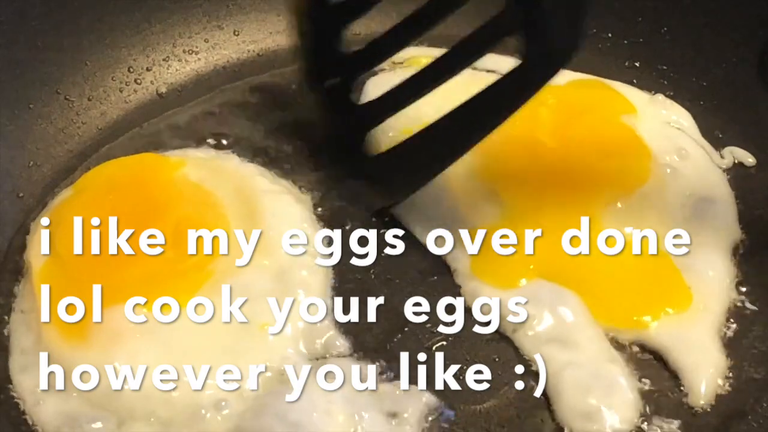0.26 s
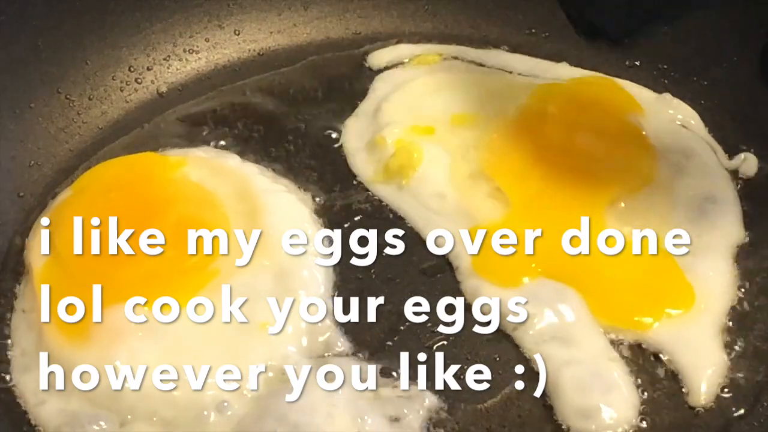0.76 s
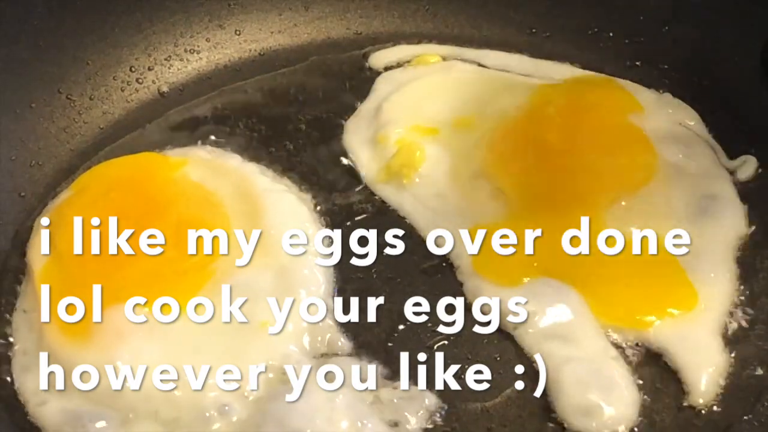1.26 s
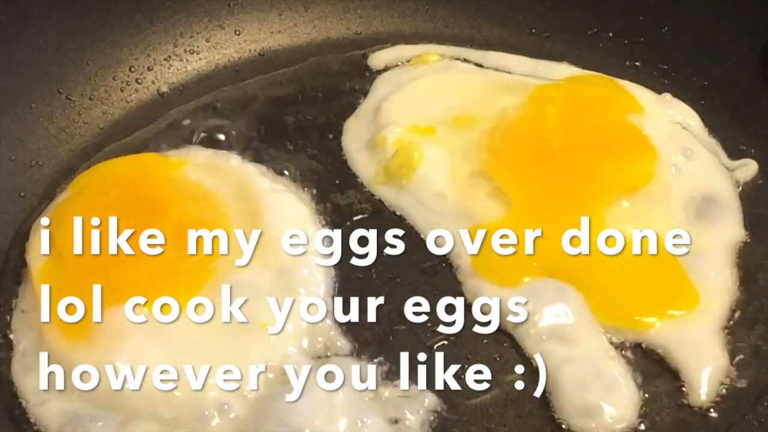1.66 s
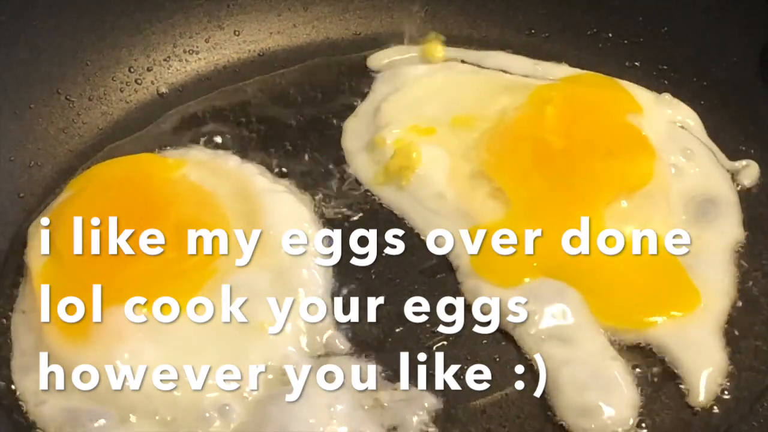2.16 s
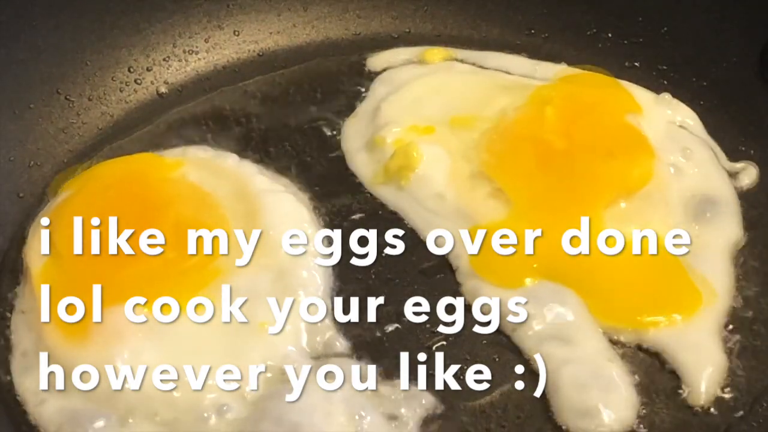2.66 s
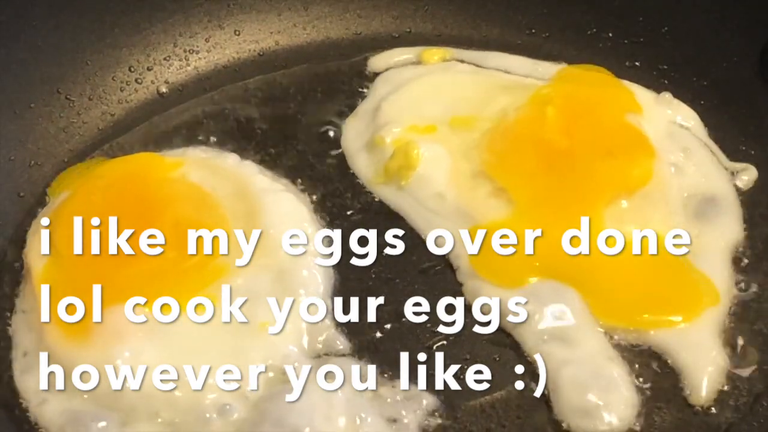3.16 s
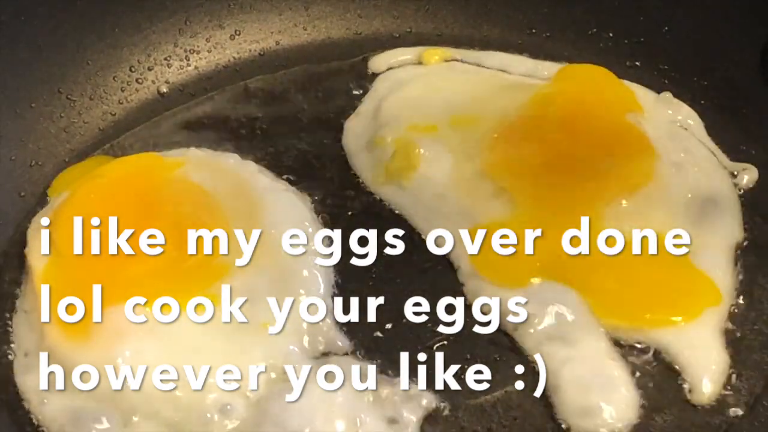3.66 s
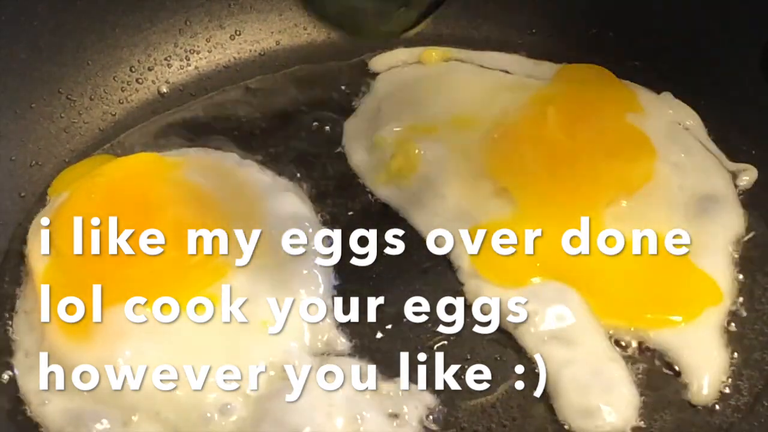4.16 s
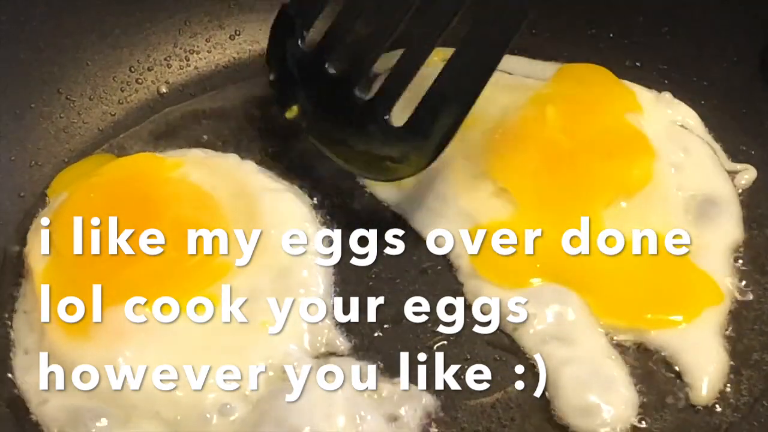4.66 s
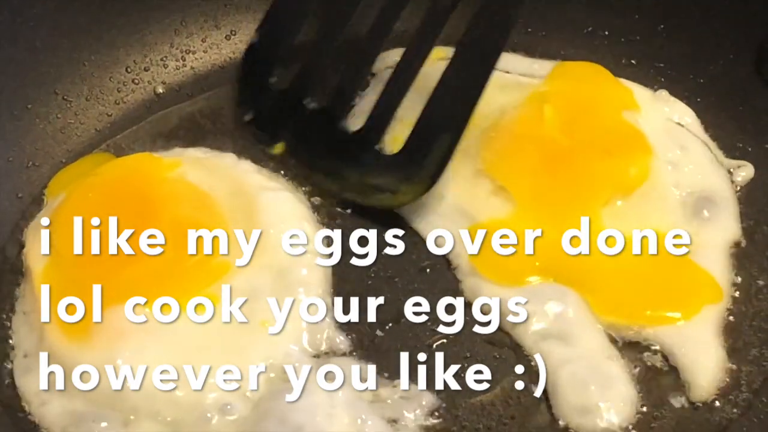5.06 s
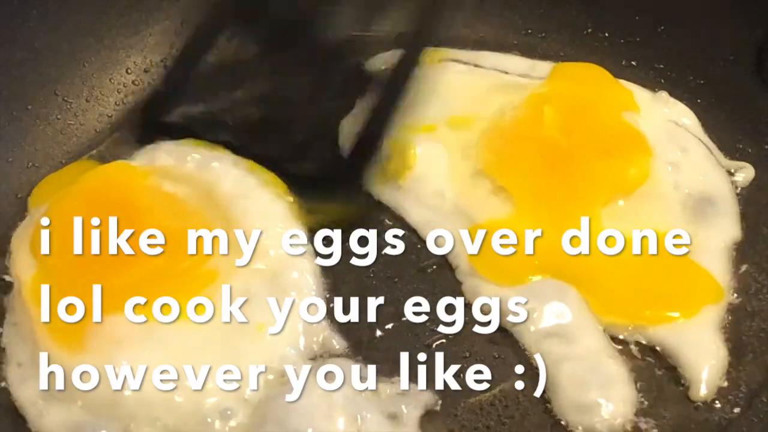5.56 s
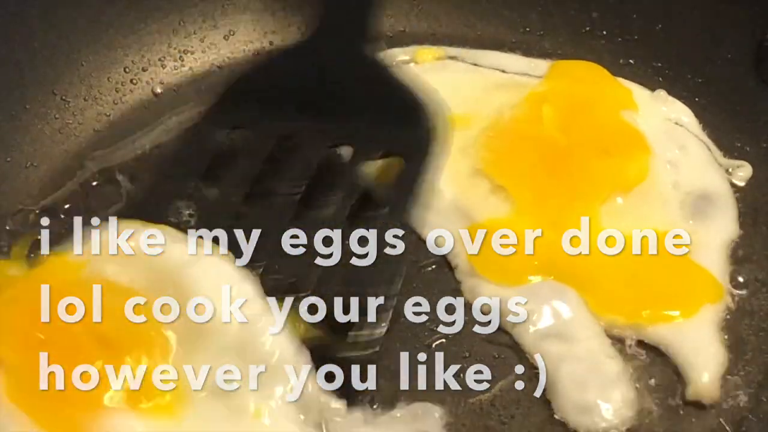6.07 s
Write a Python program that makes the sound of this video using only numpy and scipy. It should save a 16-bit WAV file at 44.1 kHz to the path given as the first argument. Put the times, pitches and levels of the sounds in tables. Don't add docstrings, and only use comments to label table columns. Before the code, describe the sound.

Eggs fry in oil close to a small microphone in a hard, lightly reverberant kitchen. A quiet fine sizzle is constant, with a barely audible low fridge hum beneath. Small pops and spits scatter from the start, with a faint spatula tap near 0.27 s and a bright, crisp burst at 0.74. Sparse ticks follow; a hollow pop at 2.0 leads to a lower sputter at 2.2 with a tiny rising hiss. The sound dips softly around 2.9. Pops resume, with a snap and weaker burst at 3.4 and a cluster at 3.8-3.9. A very sharp crack hits at 4.87. Plastic bumps on the pan begin at 5.3, and a long, loud sputter breaks out at 5.41. A faint scrape and low groan come at 5.6-5.9, with another softer slide. The sizzle swells toward 6.0, then a hard crack and spitting burst at 6.1 and a final pop at 6.25.

```python
import sys
import numpy as np
from scipy import signal
from scipy.fft import rfft, irfft, next_fast_len
from scipy.io import wavfile
from scipy.ndimage import uniform_filter1d, minimum_filter1d

SR = 44100
rng = np.random.default_rng(int(sys.argv[2]) if len(sys.argv) > 2 else 0)


def invert_db(level):
    return 10 ** (np.asarray(level, dtype=float) / 20)


def dump_mix(stems):
    frames = np.atleast_2d(stems).T
    limited = np.clip(frames, -1, 1)
    pcm = np.round(limited * 32767).astype(np.int16)
    wavfile.write(sys.argv[1], SR, pcm)


N = 278690

# t/s, level/dB
FRYING = [(0, 0), (.5, 0), (1.5, 0), (2.1, -0.4), (2.55, 1.1), (3.3, -0.5), (4.1, .5), (5.1, -1.3),
          (5.62, 0.7), (5.74, 1.5), (5.84, 2.5), (6, 5), (6.32, 2.5)]
# f/Hz, density/dB
BODY_SPECTRUM = [(240, -31), (400, 2), (754, -8.5), (838, 3.5), (922, -3.5), (1390, -0.5), (1510, -4.5),
                 (2240, -1), (4000, -5.5), (5000, -5.5), (6500, -42), (11000, -120)]
TOP_SPECTRUM = [(2060, -8), (3500, -35), (5510, 1.5), (6210, -3.5), (9360, 2), (11900, 0), (14700, 1.5),
                (15800, -1)]
BODY_DB, TOP_DB, TOP_GROWS = -58.5, -56, 0.88

# f/Hz, density/dB
RUMBLE_SPECTRUM = [(28, -45), (42, -27), (72, -5.5), (86, -12.5), (140, -2), (194, -4.5), (253, -10.5),
                   (294, -6.5), (333, -8), (419, -19.5), (700, -15.5), (910, -38), (1540, -120)]
HUM_HZ, HUM_DB, RUMBLE_DB = 59.5, -61.5, -60.5

FADE_S, FADE_HALF_S, RUMBLE_DIPS = 2.92, 0.44, 1.4

# t/s, vent/ms, f/Hz, level/dB
POPS = [(.0647, 6.9, 2410, -42.5), (.152, 6.7, 1210, -50.5), (.2655, 4, 1380, -43),
        (.3468, 3.8, 1900, -46.5), (.6474, 7.2, 1340, -44.5), (1.0225, 3.1, 3020, -45),
        (1.5988, 6.3, 1450, -44.5), (1.6321, 5.2, 4010, -51.5), (1.809, 8, 1920, -41),
        (1.8624, 6.9, 2400, -49), (1.895, 2.5, 1090, -42.5), (2.0022, .76, 1600, -35),
        (2.2183, .9, 1860, -32.5), (2.5918, 2.1, 2130, -46), (3.097, 2.5, 990, -48),
        (3.3874, 0.99, 1680, -33.5), (3.4064, 4.3, 2120, -49), (3.7374, 2.7, 1610, -47.5),
        (3.8324, 2.7, 1570, -36.5), (3.9129, 3.8, 1960, -36), (3.9797, 3.2, 1780, -48),
        (4.2728, 2.4, 1320, -50.5), (4.5046, 3, 1910, -43), (4.8073, 4, 2520, -53.5),
        (4.8669, 0.6, 2370, -36.5), (5.3032, 10, 1890, -37.5), (5.6946, 4.6, 1160, -49.5),
        (5.727, 10, 1000, -49.5), (6.0226, 12.6, 2700, -37), (6.2484, 1.3, 1920, -29)]
# t/s, vent/ms, f/Hz, level/dB
PLOPS = [(.5706, 1.5, 3700, -45), (.6294, 2.6, 990, -40.5), (.6402, 2.2, 3220, -42),
         (.7308, 2.4, 3720, -33.5), (1.1336, 3, 3070, -46), (1.1956, 2.5, 2810, -49), (1.315, 5, 1180, -52),
         (1.6578, 1.5, 4620, -40.5), (2.014, 2.4, 2720, -51), (2.329, 3.1, 1700, -44.5),
         (2.3535, 3.4, 2280, -43), (2.3739, 1.2, 2300, -38), (2.486, 1.5, 2350, -49),
         (2.4997, 1.8, 1940, -48), (3.0069, 6.9, 1250, -52), (3.5597, 2.7, 720, -48.5),
         (3.639, 1.6, 1830, -46), (3.7715, 1.7, 2960, -44), (3.789, 5.8, 3730, -48),
         (3.8751, 1.2, 1080, -48), (3.9686, 1.8, 1710, -46), (4.358, 4.3, 3700, -49.5),
         (4.537, 2.2, 2560, -44), (4.6099, 4.1, 2500, -35.5), (4.8539, 1.3, 1860, -47.5),
         (5.312, 4.1, 1260, -35.5), (5.326, 9, 1250, -53), (5.5937, 4.8, 1740, -45.5),
         (5.7057, 1.2, 1340, -52), (5.9169, 5.4, 2730, -40.5), (.139, 1.2, 5540, -43),
         (.5692, 1.4, 5450, -44), (.6245, 3, 5570, -49), (.9912, 1.7, 5540, -49), (1.56, 3, 3300, -51),
         (1.6328, 2.5, 4500, -45), (1.8068, 2.5, 4800, -43), (2.0244, 2, 6650, -46),
         (2.2105, 1.8, 2900, -53), (2.2158, 1.5, 1800, -45), (4.802, 1.5, 4000, -58), (5.512, 7, 5500, -39),
         (5.9125, 3, 5440, -47), (5.9125, 3, 2400, -46), (5.991, 3, 5030, -48), (6.096, 1.4, 2400, -44),
         (6.251, 9, 2600, -45)]
# t/s, peak/dB, f/Hz
BLIPS = [(0.217, -42.5, 2560), (0.238, -42, 2230), (0.379, -39.5, 2190), (0.43, -39, 2210),
         (0.489, -45, 3080), (0.844, -44, 2930), (0.859, -45, 1250), (0.994, -43, 1430), (1.554, -45, 1030),
         (1.719, -41, 1050), (2.841, -41, 1390), (2.877, -45.5, 872), (3.336, -42, 2090), (4.224, -48, 842),
         (4.308, -43, 2060), (4.469, -44, 1920), (5.029, -43, 2770), (5.127, -45, 1430), (5.229, -43, 2690),
         (5.539, -38, 2700), (5.759, -43, 2740), (5.991, -38, 2900), (6.289, -36.5, 2550)]
# opening t/s, f/Hz, width over pitch
POCKETS = [
    (.74, 3000, 0.51),
    (2.22, 2090, 0.49),
    (3.43, 1920, 0.88),
    (5.41, 2750, 0.5),
    (6.1, 2450, 0.85),
]
# t/s, vent/ms, cavity level/dB, jet level/dB, fineness (0 drops - 2 mist)
VENTS = [(0.7416, 3.5, -33.5, -24, 1.5), (.7445, 3.5, -32, -29, 1.5), (0.7483, 4.3, -31, -27.5, .5),
         (0.7538, 4.2, -34.5, -28, 1.2), (2.2212, 3.2, -31.5, -33, 0.2), (2.2255, 3.4, -32, -32, 0),
         (2.2288, 2.8, -29.5, -25, 1.3), (2.232, 1.4, -31, -26, .9), (2.2345, 2.3, -41, -33.5, 0.5),
         (2.2492, 0.9, -46, -37, 1.5), (3.434, 4, -45, -42.5, .5), (3.439, 3.1, -42.5, -35, .65),
         (3.4445, 3.4, -43, -44, 1.05), (3.452, 6.1, -41, -40.5, .5), (3.4817, 4.9, -40.5, -40, 1),
         (5.4172, 2, -33, -26, .7), (5.4187, 3.5, -23.5, -18.5, 0.94), (5.4241, 4.8, -31.5, -21, 1),
         (5.4294, 4.5, -34, -24, 0.9), (5.435, 6, -40, -31, 1), (5.442, 4.6, -32, -30.5, -0.2),
         (5.4475, 5, -31.5, -27, -0.5), (5.454, 7.9, -46, -40, 1), (5.4642, 4, -44, -43, 2.3),
         (5.4708, 5.5, -41, -40, -1), (5.4803, 21, -67, -47, 1), (5.5032, 7.4, -38.5, -35.5, -0.5),
         (5.508, 7.6, -47, -38.5, 0.2), (6.1031, 2.3, -26, -17.5, 1), (6.106, 5.5, -30.5, -27.5, 0.8),
         (6.1146, 6.3, -34, -35, 1.5), (6.123, 11.6, -36.5, -40, 0.5), (6.14, 4, -42, -50, .9),
         (6.1507, 6, -41, -36.5, 1)]
# f/Hz, width/Hz, level/dB
PAN_MODES = [(865, 27, 30), (1340, 40, -25.5), (1700, 180, 17), (2800, 50, -15)]
POP_WIDTH, PLOP_WIDTH, BLIP_WIDTH = 0.7, 0.28, 0.49
BLIP_MS, BLIP_CREST_DB = 3.2, 9.5

# t/s, vent/ms, level/dB, fineness (0 drops - 2 mist)
SPITS = [(0.0654, 3.8, -58, -4), (.139, 1.8, -46.5, 0.8), (.623, 8.4, -49.5, -1.5), (.6394, 1.4, -44, 3),
         (.7177, 1.3, -45, -0.1), (0.9766, 1.2, -45.5, -5), (1.1343, 1.6, -47, 2.4),
         (1.5973, 3.6, -50, 0.3), (1.6314, 3.6, -53, 1.1), (1.8128, 2.2, -45.5, 0.5), (2.253, 10.4, -51, 5),
         (3.405, 1.4, -43, -0.5), (3.458, 7, -45, .9), (3.6387, 1.8, -48, 0.7), (3.791, 5, -46, -1.5),
         (3.944, 2.1, -49, -0.5), (4.4038, 1.46, -43, -3), (5.3385, 5, -49.5, -3), (5.458, 3.8, -43, 5),
         (5.5948, 1.5, -42, 3), (5.6719, 0.91, -43.5, 0.5), (5.701, 1.6, -45, -0.2),
         (5.8563, 1.7, -41.5, 1.5), (5.937, 3.2, -41, 0.6), (5.941, 5.8, -49, .6), (5.9656, 0.79, -46, -.1),
         (6.022, 3, -40, 1), (6.026, 3.5, -33.5, 0.9), (6.031, 10.3, -38, 0.9), (6.1667, 7.4, -45, -0.3),
         (6.248, 1.4, -45, 0.5)]
# t/s, level/dB, fineness (0 drops - 2 mist)
TICKS = [(0.2388, -47, 3), (.3128, -42.5, 1.3), (0.57, -43, 0), (.647, -43.5, 0.4), (0.739, -33, 2),
         (0.992, -42, -2), (1.0226, -45, 2.4), (1.1551, -41.5, 1.4), (1.6584, -49, 5), (1.7686, -46, 1.2),
         (1.8086, -52, 1), (1.8956, -42.5, 0), (2.0252, -41.5, 0.5), (2.4146, -41.5, 6), (2.4996, -41, 1.3),
         (3.3869, -35.5, -2), (3.4079, -46, 0), (3.4293, -41, 0.4), (3.6523, -48, 1.5), (3.832, -40.5, 1),
         (3.834, -35.5, 0), (3.8372, -41, 5), (3.9129, -33.5, 0.1), (3.916, -37, 5), (3.939, -48, 0.5),
         (4.5047, -38, 5), (4.8078, -43, 1), (4.8668, -31, 1.4), (5.6, -50, 1), (5.8379, -40, 1.8),
         (1.8625, -50, .7), (2.5441, -45, 1), (2.8816, -50, 2.5), (3.7366, -48, 0.8), (3.979, -48, .3),
          (4.3192, -45.5, 0.3), (4.4306, -51, .7), (4.5099, -47, 2.2), (5.383, -50, 0.7),
          (2.109, -50.5, 1.3), (5.9, -48, 0), (5.921, -46, 1), (5.933, -46, .5), (5.996, -45, 0.5),
          (6.008, -47, .8), (6.014, -47, 1.2)]
# f/Hz, width/Hz, level/dB
SPIT_MODES = [(4440, 1930, 7), (7100, 2700, 6)]
SPRAY_MODES = [(9050, 3630, -0.24), (10900, 4240, -2.5)]
MIST_MODES = [(12130, 6800, 0), (15900, 1100, 0)]
TICK_MS = 0.81
SINGLE_LOSS_DB, POCKET_LOSS_DB = 7, 8

# t/s, peak/dB
SNAPS = [(.2652, -33), (.4915, -32), (0.7394, -20), (1.0228, -36), (2.2497, -27), (3.4402, -22),
         (3.7372, -36), (3.7642, -37), (3.7718, -33), (3.8322, -28), (3.9124, -24), (3.9505, -37),
         (3.9688, -36), (4.8076, -24), (4.8669, -9.5), (4.8671, -12), (4.8704, -30), (4.8723, -25),
         (5.3095, -33), (5.5418, -35), (5.5952, -31), (5.9657, -28), (6.1036, -14), (6.1043, -10),
         (6.2484, -27), (6.2893, -32)]
# f/Hz, width/Hz, level/dB
CRACK_MODES = [(2500, 2500, -10), (10600, 7200, 1.5)]
SNAP_WET_DB = -9

# f/Hz, t60/s
KITCHEN_T60 = [(300, 0.98), (2000, 0.41), (8000, 0.32), (15000, 0.16)]

# t/s, peak/dB, f/Hz, t60/s
BUMPS = [(.266, -51.5, 792, 0.44), (0.266, -38, 1433, 0.054), (.268, -43, 706, 0.056),
         (.292, -48, 760, .07), (.308, -53, 1410, 0.088), (1.899, -54.5, 818, 0.26),
         (4.135, -52, 65.4, 0.22), (5.302, -46, 1247, 0.28), (5.303, -37, 1560, 0.12),
         (5.422, -34.5, 852, 0.13), (5.426, -44.5, 151, 0.26), (5.433, -39, 306, 0.083),
         (5.519, -44.5, 410, 0.074), (5.529, -46.5, 135, 0.53), (5.782, -38, 137, 0.21),
         (5.84, -44, 147.4, 0.28), (6.103, -31.5, 780, 0.02)]

# t/s, length/s, start f/Hz, end f/Hz, level/dB
WHISTLES = [
    (2.2212, .0135, 5000, 11200, -27),
    (2.2186, .003, 3000, 10500, -38),
]
WHISTLE_WIDTH_HZ = 1700

# t/s, length/s, level/dB
SLIDES = [
    (5.658, 0.14, -51.5),
    (5.883, .12, -57),
]
# f/Hz, width/Hz, level/dB
SCRAPE_MODES = [(6400, 2400, 0), (1200, 900, -11)]
# f/Hz, width/Hz, level/dB
GROAN_MODES = [(277, 270, 0)]
GROAN_S, GROAN_LENGTH_S, GROAN_DB = 5.62, 0.31, -58

CEILING, KNEE = 0.55, 3
STEADY_HZ, TOP_HZ = 15950, 16900


def unit(x):
    return x / np.sqrt(np.mean(x ** 2) + 1e-20)


def held(x, ms):
    return x / np.sqrt(np.sum(x ** 2) / ((ms + 1.33) * SR / 1e3))


def along(points, hz):
    f, v = np.transpose(points)
    return np.interp(np.log(hz + 1), np.log(f + 1), v)


def curves(rows):
    s, *cols = np.transpose(rows)
    return [np.interp(np.arange(N) / SR, s, c) for c in cols]


def filtered(x, response):
    m = next_fast_len(len(x) + 4096)
    return irfft(rfft(x, m) * response(np.fft.rfftfreq(m, 1 / SR)), m)[:len(x)]


def resonances(modes, order=1):
    def raw(f):
        total = 0
        for k, (centre, width, db) in enumerate(modes):
            damping = 1j * f * width
            total = total + (-1) ** k * invert_db(db) * damping / (centre * centre - f * f + damping)
        return total ** order

    return lambda f: raw(f) / np.sqrt(np.mean(np.abs(raw(f)) ** 2))


def rush(spectrum, patchy_db):
    z = signal.stft(rng.standard_normal(N + 512), nperseg=256)[2]
    field = uniform_filter1d(rng.standard_normal(z.shape), size=8, axis=0)
    field = uniform_filter1d(field, size=14, axis=1)
    noise = signal.istft(z * invert_db(patchy_db * unit(field)), nperseg=256)[1][:N]
    return unit(filtered(noise, lambda hz: invert_db(along(spectrum, hz))))


def crossfade():
    side = np.clip((np.arange(N) / SR - FADE_S) / FADE_HALF_S, -1, 1)
    return side, np.sqrt((1 + side ** 2) / 2)


def fizz(mid_hz, spread, cycles, count, span=300):
    when, pitch, size = rng.random(count), rng.standard_normal(count), rng.exponential(size=count)
    hz = np.clip(mid_hz * np.exp(spread * pitch), 600, 15000)[:, None]
    t = np.arange(span) / SR
    level = invert_db(2.9 * np.minimum(size, 3))[:, None]
    grains = level * np.sin(2 * np.pi * hz * t) * np.exp(-t * hz / cycles)
    at = (when * N).astype(int)[:, None] + np.arange(span)
    return unit(np.bincount(at.ravel(), grains.ravel(), N + span)[:N])


def sizzle():
    frying_db, = curves(FRYING)
    body_db, top_db = BODY_DB + frying_db, TOP_DB + TOP_GROWS * frying_db
    hush, hiss = rush(BODY_SPECTRUM, patchy_db=1.5), rush(TOP_SPECTRUM, patchy_db=1.1)
    body = hush + invert_db(-5.5) * fizz(mid_hz=1910, spread=0.515, cycles=2.3, count=900)
    crackle_db = -6.5 + 0.8 * (top_db + 55.5)
    top = hiss + invert_db(crackle_db) * fizz(mid_hz=8600, spread=0.39, cycles=1.4, count=2200)
    return crossfade()[1] * (invert_db(body_db) * body + invert_db(top_db) * top)


def appliances():
    drift = uniform_filter1d(uniform_filter1d(rng.standard_normal(N), size=4000), size=3000)
    level = np.sqrt(2) * invert_db(HUM_DB + 0.96 * unit(drift))
    line = level * np.sin(2 * np.pi * HUM_HZ * np.arange(N) / SR)
    side, dip = crossfade()
    return side * line + invert_db(RUMBLE_DB) * dip ** RUMBLE_DIPS * rush(RUMBLE_SPECTRUM, patchy_db=1.5)


def choke(noise):
    return unit(uniform_filter1d(noise, size=24))


def vent(ms, noise, sputter, fade_ms, snap):
    t_ms = np.arange(len(noise)) * 1e3 / SR
    opening = 1 - np.exp(-t_ms / (0.069 * ms))
    emptying = np.exp(-.5 * t_ms / (ms + 1))
    fade = np.exp(-np.maximum(t_ms - ms, 0) / (fade_ms + 0.27 * ms))
    jet = opening * emptying * fade * noise * invert_db(3 * sputter)
    click = snap * (np.arange(len(t_ms)) == 3)
    return held(jet + click, ms)


def cavities():
    opens = np.transpose(POCKETS)[0]
    rows = []
    for s, ms, db, _, _ in VENTS:
        _, hz, width = POCKETS[max(np.searchsorted(opens, s) - 1, 0)]
        rows.append((s, ms, hz, width * hz, db))
    for events, width in ((PLOPS, PLOP_WIDTH), (POPS, POP_WIDTH)):
        rows += [(s, ms, hz, width * hz, db) for s, ms, hz, db in events]
    rows += [(s, BLIP_MS, hz, BLIP_WIDTH * hz, db - BLIP_CREST_DB) for s, db, hz in BLIPS]
    return rows


def pops(span=2048):
    out = np.zeros(N + span)
    low_push = resonances([(600, 1660, 0)])
    for s, ms, hz, width_hz, db in cavities():
        noise, ms = rng.standard_normal((2, span)), max(ms - .6, .1)
        violence = width_hz / hz
        cavity = resonances([(hz, 1.38 * width_hz, 0)], order=2)
        jet = vent(ms, noise[0], choke(noise[1]), 0.16, snap=12 * violence)
        ring = filtered(jet, lambda f: cavity(f) - 0.31 * violence * low_push(f))
        out[round(s * SR):][:span] += invert_db(db) * held(ring, ms)
    return out[:N] + invert_db(-42) * filtered(out[:N], resonances(PAN_MODES))


def jets():
    jet_rows = [(s, ms, db, fine, POCKET_LOSS_DB) for s, ms, _, db, fine in VENTS]
    jet_rows += [(*row, SINGLE_LOSS_DB) for row in SPITS]
    jet_rows += [(s, TICK_MS, db, fine, SINGLE_LOSS_DB) for s, db, fine in TICKS]
    rows = []
    for s, ms, db, fine, loss_db in jet_rows:
        away = (np.arange(3) - fine) ** 2
        rows.append((s, ms, *(db - loss_db * (away - away.min()))))
    return rows


def spits(span=2048):
    layers = np.zeros((3, N + span))
    for s, ms, *db in jets():
        noise, ms = rng.standard_normal((2, span)), max(ms - .5, .1)
        jet = vent(ms, noise[0], choke(noise[1]), 0.18, snap=4 / (1 + ms))
        layers[:, round(s * SR):][:, :span] += invert_db(db)[:, None] * jet
    groups = (SPIT_MODES, SPRAY_MODES, MIST_MODES)
    return sum(filtered(x[:N], resonances(modes, order=2)) for x, modes in zip(layers, groups))


def kitchen(x, part=SR // 4):
    out = np.zeros(N + SR)
    for start in range(0, N, part):
        hz, t, z = signal.stft(rng.standard_normal(SR // 2), SR, nperseg=256)
        walls = invert_db(-60 * t / along(KITCHEN_T60, hz)[:, None])
        rim = 2.82 * invert_db(-60 * t / 0.05)
        tail = signal.istft(z * (walls + rim), SR, nperseg=256)[1]
        wet = signal.fftconvolve(x[start:start + part], tail / np.linalg.norm(tail))
        out[start + 60:][:len(wet)] += wet
    return out[:N]


def snaps():
    blows = np.zeros(N)
    for s, db in SNAPS:
        blows[round(s * SR)] += invert_db(db)
    return filtered(blows, resonances(CRACK_MODES))


def spatula():
    out, t = np.zeros(N + SR), np.arange(SR // 3) / SR
    for s, db, hz, t60 in BUMPS:
        swell = (1 - np.exp(-t * hz / .5)) * invert_db(db - 60 * t / max(t60, .02))
        waver = unit(uniform_filter1d(rng.standard_normal(len(t)), size=1300))
        tone = np.sin(2 * np.pi * hz * t + 0.79 * waver[::-1])
        out[round(s * SR):][:len(t)] += swell * invert_db(2.8 * waver) * tone
    return out[:N]


def whistles():
    out = np.zeros(N)
    for s, length, from_hz, to_hz, db in WHISTLES:
        u = np.linspace(0, 1, round(length * SR))
        hz = from_hz + (to_hz - from_hz) * np.sin(np.pi * u / 2)
        breath = filtered(rng.standard_normal(len(u)), resonances([(1, WHISTLE_WIDTH_HZ / 2, 0)]))
        tone = unit(breath * np.sin(2 * np.pi * np.cumsum(hz) / SR))
        out[round(s * SR):][:len(u)] += invert_db(db) * np.sin(np.pi * u) ** .3 * tone
    return out


def scrape(count=7000):
    t = np.arange(N) / SR

    def arch(s, length):
        return np.sin(np.pi * np.clip((t - s) / length, 0, 1))

    when, size = rng.random(count), rng.exponential(size=count)
    grit = np.bincount((when * N).astype(int), invert_db(5.0 * np.minimum(size, 3)), N)
    grit = uniform_filter1d(grit, size=40) * rng.standard_normal(N)
    stroke = sum(invert_db(db) * arch(s, length) for s, length, db in SLIDES)
    lumps = invert_db(5.4 * unit(uniform_filter1d(rng.standard_normal(N), size=1500)))
    groan = unit(lumps * filtered(rng.standard_normal(N), resonances(GROAN_MODES, order=2)))
    blade = stroke * unit(filtered(grit, resonances(SCRAPE_MODES)))
    return blade + invert_db(GROAN_DB) * arch(GROAN_S, GROAN_LENGTH_S) * groan


def scene():
    steady = sizzle() + appliances()
    bursts, cracks = pops() + spits() + whistles(), snaps()
    wet = invert_db(-6.5) * kitchen(bursts + invert_db(SNAP_WET_DB) * cracks)
    return (steady + bursts + cracks + wet + spatula() + scrape())[None]


def top_cut(x):
    return signal.sosfilt(signal.butter(12, 16990, fs=SR, output="sos"), x)


def record(dry):
    dry = dry / (1 + np.abs(dry / CEILING) ** KNEE) ** (1 / KNEE)
    steady = filtered(dry[0], lambda hz: hz < STEADY_HZ)
    power = np.abs(uniform_filter1d(np.diff(steady, prepend=0) ** 2, size=128))
    before = np.roll(np.abs(uniform_filter1d(power, size=600)), 400)
    attack = -minimum_filter1d(-1. * (power > 30 * before), size=400)
    gated = uniform_filter1d(attack, size=100) * (dry[0] - steady)
    top = filtered(gated, lambda hz: (hz > STEADY_HZ) & (hz < TOP_HZ))
    mix = steady + invert_db(-7) * top
    return top_cut(mix[None])


dry = scene()
out = record(dry)
dump_mix(out)
```